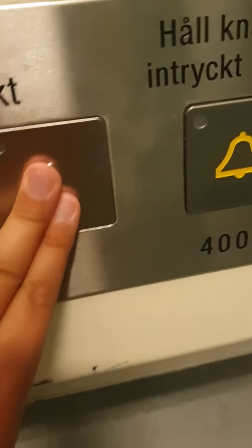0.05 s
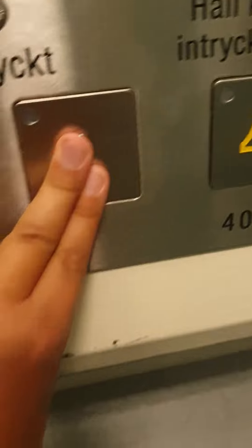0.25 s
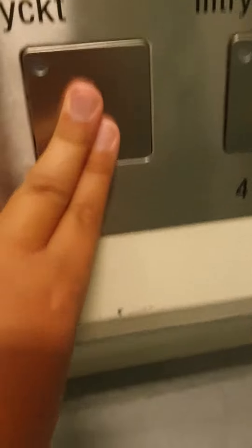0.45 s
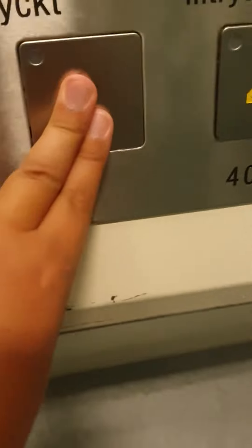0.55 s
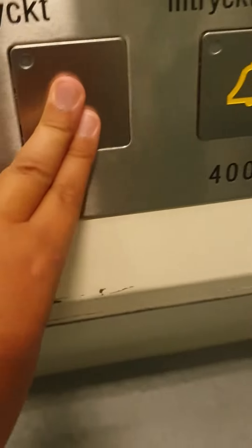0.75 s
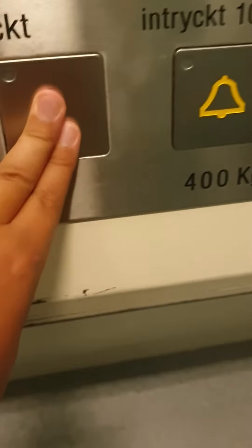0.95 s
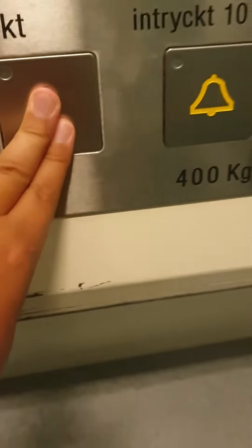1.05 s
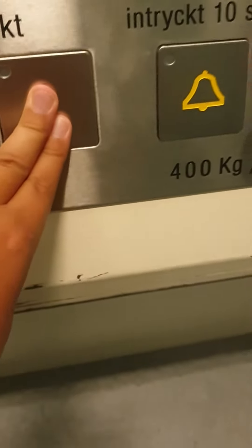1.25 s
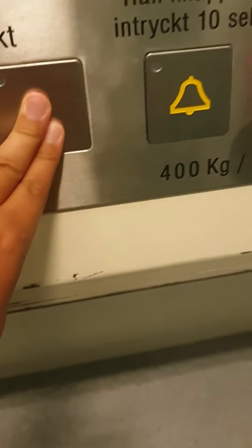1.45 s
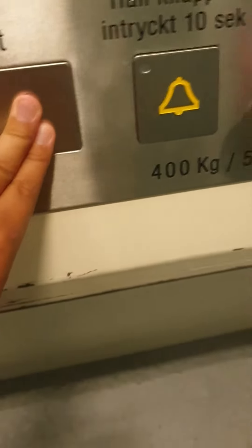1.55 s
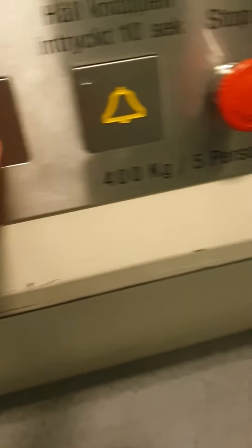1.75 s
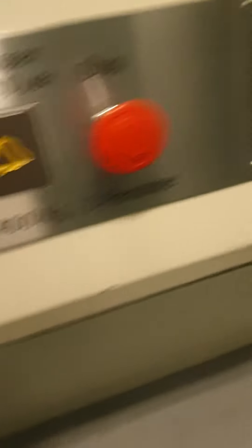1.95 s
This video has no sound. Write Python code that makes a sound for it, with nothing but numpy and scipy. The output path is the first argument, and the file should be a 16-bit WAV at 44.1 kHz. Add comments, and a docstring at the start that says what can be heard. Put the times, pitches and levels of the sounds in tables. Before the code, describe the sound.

A lift sets off with a sharp, ringing double clack and a low shudder. The motor then hums steadily over the ride's rumble, with faint scraping and a brief panel creak, heard on a stereo microphone inside the car.

```python
"""Inside a small lift as it starts, heard on a stereo microphone in the car. Out in the shaft a contactor
clacks shut and rings; a tenth of a second later the brake clacks open, both blurred by the shaft's echo.
The starting motor jolts the car near mains frequency, then settles into a geared hum over the rumble of
the ride. A shoe hisses past a rail joint, the guides scuff softly, and near the end a panel creaks."""
import sys
import numpy as np
from scipy import signal
from scipy.fft import rfft, irfft
from scipy.io import wavfile

SR = 44100
rng = np.random.default_rng(int(sys.argv[2]) if len(sys.argv) > 2 else 0)


def transcribe(signal):
    """Save signal, clipped to [-1, 1], as a 16-bit WAV file at the path in sys.argv[1]."""
    frames = np.atleast_2d(signal).T
    limited = np.clip(frames, -1, 1)
    pcm = np.round(limited * 32767).astype(np.int16)
    wavfile.write(sys.argv[1], SR, pcm)


N = 88200
T = np.arange(N) / SR

# how alike the two sides of the microphone are in the car: frequency_hz, correlation
STEREO_LIKENESS = [(60, 1), (180, 0.96), (350, 0.88), (700, 0), (3000, 0), (12000, 0)]


def from_db(db):
    """Decibels to gain."""
    return 10 ** (np.asarray(db) / 20)


def rms_one(x):
    """Scale to rms 1."""
    return x / np.sqrt(np.mean(x ** 2) + 1e-20)


def fader(points):
    """Gain at every sample from rows of time_s, level_db."""
    return from_db(np.interp(T, *np.transpose(points)))


def at_hz(points, hz):
    """Read a table on a log-frequency axis."""
    frequencies, values = np.transpose(points)
    return np.interp(np.log(hz + 1), np.log(frequencies), values)


def pan(db):
    """Channel gains that put the left db above the right."""
    return from_db(np.array([[1], [-1]]) * db / 2)


def drift(rate_hz):
    """A slow random wander of rms 1."""
    hz = np.arange(N + 1) * SR / (2 * N)
    return rms_one(irfft(rfft(rng.standard_normal(2 * N)) / (1 + (hz / rate_hz) ** 2)))[:N]


def swell(start_s, rise_s, t60_s):
    """A smooth rise followed by an exponential decay."""
    age = T - start_s
    attack = np.sin(np.pi / 2 * np.clip(age / rise_s, 0, 1)) ** 2
    return attack * from_db(-60 * np.maximum(age - rise_s, 0) / t60_s)


def pile_up(hits, rise_s, t60_s):
    """The envelope of several blows, added in power."""
    return np.sqrt(sum((from_db(db) * swell(start, rise_s, t60_s)) ** 2 for start, db in hits))


def diffuse(colour):
    """Coloured noise reaching the microphone from all round the car; rms 1."""
    # the car's lean to one side: frequency_hz, left_minus_right_db
    balance = [(50, 4), (170, 4), (380, -2), (900, 3.5), (1600, 1), (3000, 1.5), (5500, 8), (9000, 1.5),
               (14000, 1)]
    hz = np.arange(N // 2 + 1) * SR / N
    mid, side = rfft(rng.standard_normal((2, N)))
    alike = at_hz(STEREO_LIKENESS, hz)
    stereo = np.sqrt(1 + alike) * mid + np.sqrt(1 - alike) * side * [[1], [-1]]
    return rms_one(irfft(stereo * from_db(at_hz(colour, hz)) * pan(at_hz(balance, hz)), N))


def clack(hits, colour, rise_s):
    """Each blow fills the shaft with dense echoes that die sooner in the treble."""
    # reverberation of the shaft: frequency_hz, t60_s
    shaft_decay = [(60, 0.75), (250, 1.15), (900, .7), (2500, 0.7), (6000, 0.56), (13000, 0.33)]
    spectrum, out = rfft(diffuse(colour)), 0
    hz, centres = np.arange(N // 2 + 1) * SR / N, np.geomspace(60, 15000, 9)
    for centre, share in zip(centres, np.eye(len(centres))):
        band = irfft(spectrum * at_hz(np.c_[centres, share], hz), N)
        out += band * pile_up(hits, rise_s, at_hz(shaft_decay, centre))
    return out


def ringing(hits, modes, rise_s, rough):
    """Blows feed the steel's modes, which waver on their way to each side of the microphone."""
    out = np.zeros((2, N))
    for hz, db, t60 in modes:
        envelope = from_db(db) * pile_up(hits, rise_s, t60)
        for channel in out:
            phase = 2 * np.pi * (hz * T + rng.random())
            waver = drift(52) * np.sin(phase) + drift(40) * np.cos(phase)
            channel += envelope * (np.sin(phase) + rough * waver)
    return out


def contactor():
    """Out in the shaft the contactor slams shut, its armature chatters and the steel rings high."""
    # blows of the armature: start_s, clack_db, ring_db
    hits = [(0.218, -6.5, -18), (0.227, 0, 0), (0.246, -6.5, -3.5), (0.274, -16, -7), (0.297, -14, -15),
            (0.325, -11, -2.5)]
    # spectrum of the clack: frequency_hz, level_db
    colour = [(60, -20.5), (150, -0.5), (400, -5.5), (700, -12), (1500, -12), (1900, -19.5), (2700, -13),
              (3400, -16.5), (4800, -18.5), (6200, -30), (8000, -55), (11000, -32.5), (15000, -40)]
    # modes of the steel: pitch_hz, level_db, t60_s
    modes = [(1481, -17, .35), (1712, -15, .35), (2180, -15, .3), (2606, -12, .5), (2694, -12, .4),
             (2925, -4, .2), (2950, 2, .25), (2966, 1, .6), (2985, -3, .25), (3030, -7, .22),
             (3914, -17, .3), (3990, -15, .3), (4032, -15, .3), (4522, -16, .3), (4706, -15, .4),
             (4818, -20, .3), (5972, -10, .4), (6010, -15, .3), (6070, -16, .3)]
    clack_hits = [(start, db) for start, db, _ in hits]
    ring_hits = [(start, db) for start, _, db in hits]
    impact = from_db(-25) * clack(clack_hits, colour, rise_s=0.0081)
    return impact + from_db(-31.5) * pan(6.5) * ringing(ring_hits, modes, rise_s=0.01, rough=0.47)


def brake():
    """The brake clacks open and rings, lower and longer than the contactor."""
    # blows of the brake: start_s, level_db
    hits = [(0.331, -1.5), (0.337, -2), (0.355, -9), (0.388, -26)]
    # spectrum of the clack: frequency_hz, level_db
    colour = [(60, -21.5), (140, -4.5), (350, -11), (620, -7.5), (950, 8.5), (1130, -13), (1400, -1.5),
              (1900, -13), (2600, -6.5), (3150, -15), (3800, -11.5), (5600, -19.5), (7000, -26),
              (8500, -47), (10500, -28.5), (14500, -21)]
    # modes of the steel: pitch_hz, level_db, t60_s
    modes = [(631, -14, .8), (731, -9, .7), (810, -7, .7), (836, -4, .7), (894, -2.5, .75), (913, -2, .65),
             (956, -1, .6), (975, -3, .5), (1021, 2, .5), (1209, -12, .5), (1265, -12, .55),
             (1344, -11, .55), (1588, -12, .4), (2347, -13, .35), (2500, -11, .4), (2616, -10, .4),
             (3768, -13, .3)]
    impact = from_db(-23) * clack(hits, colour, rise_s=0.0078)
    return impact + from_db(-28.5) * pan(3.5) * ringing(hits, modes, rise_s=0.014, rough=0.85)


def jolts():
    """The starting torque shakes the car around the microphone in deep, dying throbs."""
    # throbs of the car: start_s, level_db, pitch_hz, rise_s, t60_s
    throbs = [(0.236, -15, 51.3, .036, 0.24), (0.347, -23, 55.9, 0.041, 0.35), (0.445, -25, 53, 0.044, 1)]
    out = 0
    for start, db, hz, rise, t60 in throbs:
        out += from_db(db) * swell(start, rise, t60) * np.sin(2 * np.pi * hz * (T - start))
    return pan(2.8) * out


def ride():
    """The moving car rumbles on all sides, hardest as it sets off."""
    # spectrum of the rumble: frequency_hz, level_db
    colour = [(18, -31.5), (28, -9), (40, 1), (58, 7.5), (72, -3.5), (100, -12.5), (125, -3), (170, -7),
              (260, -6.5), (350, -11.5), (520, -12.5), (700, -14.5), (860, -11), (1000, -21.5), (1200, -22),
              (2000, -26), (2700, -25.5), (3250, -31), (3650, -29), (4200, -37), (5600, -41.5), (6600, -53),
              (7800, -71.5), (15000, -71.5)]
    # course of the rumble: time_s, level_db
    levels = [(0.3, -23), (0.65, -37.5), (0.9, -38), (1.15, -39.5), (1.55, -39), (2.0, -38.5)]
    return fader(levels) * diffuse(colour)


def gears():
    """Motor and gears hum at multiples of the rotation rate, strongest around the tooth mesh."""
    # motor and gear tones: cycles_per_turn, level_db
    orders = [(8, -51), (10, -48), (18, -60), (32, -53), (33, -58), (34, -59), (35, -47), (37, -59),
              (38, -60), (42, -61), (43, -65), (46, -66), (49, -68), (63, -66), (71, -71), (73, -71),
              (94, -71), (110, -69), (143, -75), (145, -75), (148, -74)]
    # course of the hum: time_s, level_db
    levels = [(0.5, -2), (0.9, 4.5), (1.25, 1), (1.45, 0.5), (2.0, -4.5)]
    rotation_hz, speed_wander, flutter_db, stereo_spread = 24.125, 0.00076, 2.5, 0.68
    turns = np.cumsum(rotation_hz * (1 + speed_wander * drift(2.4))) / SR
    out = 0
    for order, db in orders:
        right_lag = stereo_spread * np.arccos(at_hz(STEREO_LIKENESS, order * rotation_hz))
        gain = from_db(db + flutter_db * drift(5.5))
        phase = 2 * np.pi * (order * turns + rng.random())
        out += gain * np.sin([phase, phase - right_lag])
    return from_db(-0.5) * fader(levels) * pan(4.5) * out


def drones():
    """Narrow, wavering tones of the motor and the car's panels."""
    # sustained tones: pitch_hz, level_db, width_hz
    tones = [(82.6, -48, 6), (300, -50.5, 4.3), (541, -59, 14)]
    out = 0
    for hz, db, width in tones:
        phase = 2 * np.pi * hz * T
        out += from_db(db) * (drift(width) * np.sin(phase) + drift(width) * np.cos(phase))
    return pan(2) * out


def panel_creak():
    """Close by, a panel of the car creaks twice and rings."""
    # creaks: start_s, level_db
    creaks = [(1.722, -42), (1.765, -50)]
    # modes of the panel: pitch_hz, level_db, t60_s
    modes = [(245, 0, .4), (436, 0, .7), (505, -4, .5), (552, -1, .6), (1205, -10, .5)]
    return ringing(creaks, modes, rise_s=0.019, rough=0.4)


def scuffs():
    """Soft, broad bumps and rubs along the guides, just outside the car."""
    # rubs on the guides: start_s, level_db, centre_hz, rise_s, t60_s, left_minus_right_db
    rubs = [(0.856, -58.5, 3180, 0.0091, 0.82, 5), (0.86, -49.5, 1330, 0.023, 0.25, 1),
            (0.895, -36.5, 190, 0.033, 0.12, 1), (1.13, -53.5, 2190, .025, 0.51, 2.5),
            (1.32, -54.5, 2190, .03, 0.31, 6.5), (1.43, -52.5, 2300, 0.024, 0.4, 2),
            (1.575, -51, 1200, 0.036, 0.48, 2), (1.72, -43, 443, 0.027, 0.52, -2.5),
            (1.725, -54, 2400, 0.016, 0.52, 3.5), (1.76, -45.5, 950, 0.018, .5, 0),
            (1.745, -43, 50, 0.032, 0.44, 5)]
    out = 0
    for start, db, hz, rise, t60, pan_db in rubs:
        hump = [(hz / 8, -37), (hz / 2, -9.25), (hz, 0), (hz * 2, -18.5), (hz * 3, -74)]
        out += from_db(db) * pan(pan_db) * swell(start, rise, t60) * diffuse(hump)
    return out


def shoe_hiss():
    """A soft, bright hiss as a guide shoe slides past a rail joint."""
    # spectrum of the rub: frequency_hz, level_db
    colour = [(1000, -15), (3000, -4), (4500, 0), (6200, -2), (8000, -24), (11000, -18), (15000, -16)]
    return from_db(-62) * swell(start_s=0.856, rise_s=0.012, t60_s=0.7) * diffuse(colour)


def opening_tick():
    """A very faint, dull tick in the first 4 ms."""
    # spectrum of the tick: frequency_hz, level_db
    colour = [(40, -8), (130, 0), (400, -1), (800, -18), (2000, -29), (3000, -11), (6000, -30), (8000, -29)]
    fade_out = np.sin(np.pi / 2 * np.maximum(0.0044 - T, 0) / 0.0113) ** 2
    return from_db(-53) * fade_out * diffuse(colour)


def room_tone():
    """The quiet, low murmur of the car itself, there throughout."""
    # spectrum of the waiting car: frequency_hz, level_db
    colour = [(18, -25), (30, 2.5), (52, 3.5), (95, -13.5), (180, -10.5), (260, -17), (400, -23.5),
              (600, -25.5), (870, -27.5), (1200, -34.5), (3000, -37), (5500, -38.5), (8000, -53),
              (12000, -37.5), (15000, -38)]
    return from_db(-64) * diffuse(colour)


def scene():
    """Contactor, brake, then the running lift, all heard from inside the car."""
    starting = opening_tick() + contactor() + brake() + jolts()
    fade_in = np.interp(T, [0.19, 0.49], [0, 1])  # as the motor spins up
    running = fade_in * (gears() + drones() + ride())
    return starting + running + panel_creak() + shoe_hiss() + scuffs() + room_tone()


def record(dry):
    """The microphone chain cuts the deepest rumble and the very top."""
    low_cut = signal.butter(2, 24, "high", fs=SR, output="sos")
    high_cut = signal.ellip(12, 0.1, 80, 15600, fs=SR, output="sos")
    return signal.sosfilt(high_cut, signal.sosfilt(low_cut, dry))


dry = scene()
out = record(dry)
transcribe(out)
```